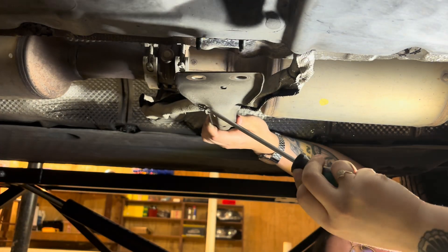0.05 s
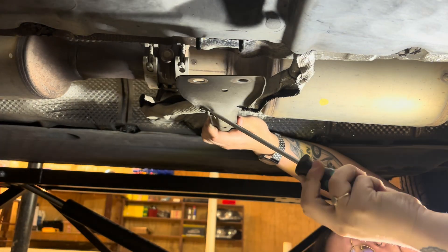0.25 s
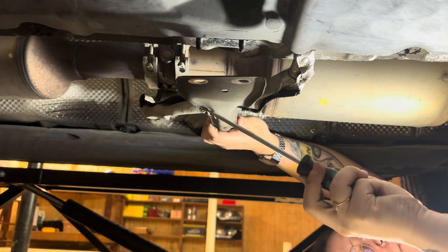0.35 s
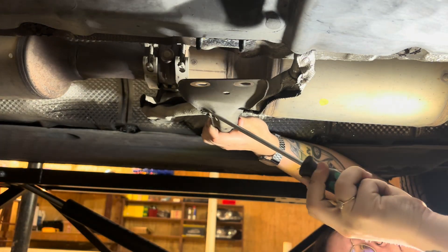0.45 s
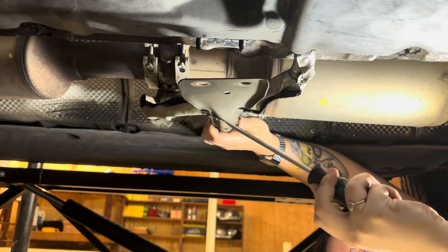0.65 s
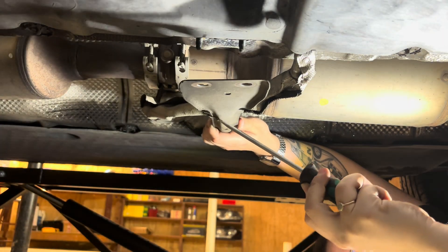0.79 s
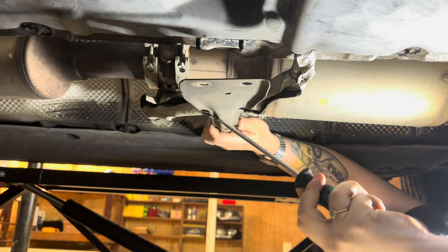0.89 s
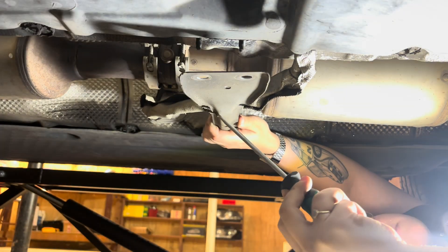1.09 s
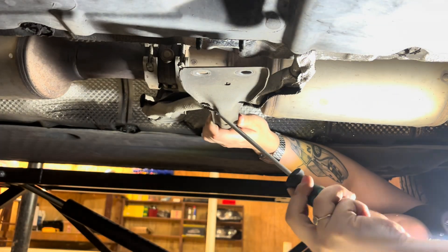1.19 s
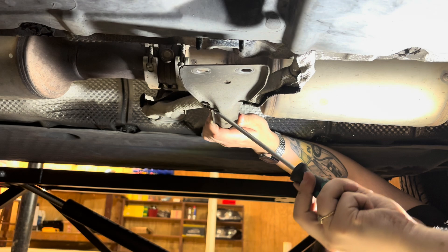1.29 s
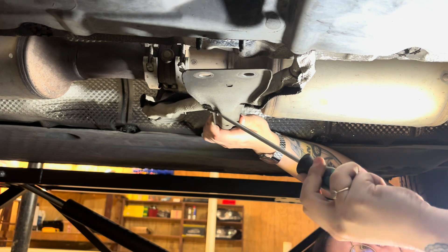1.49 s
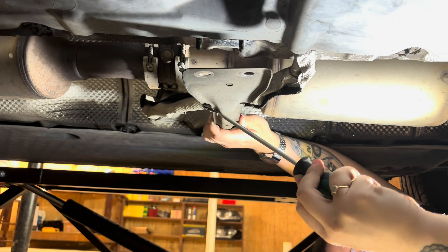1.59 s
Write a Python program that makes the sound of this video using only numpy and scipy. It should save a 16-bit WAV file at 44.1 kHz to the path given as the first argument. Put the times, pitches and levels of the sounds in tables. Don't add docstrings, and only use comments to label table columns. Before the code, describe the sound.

Screwdriver tip slips off a steel bracket with two bright snaps, faint scraping and taps between

```python
import sys
import numpy as np
from scipy import signal
from scipy.fft import rfft, irfft, next_fast_len
from scipy.io import wavfile
from scipy.ndimage import map_coordinates

SR = 44100
rng = np.random.default_rng(int(sys.argv[2]) if len(sys.argv) > 2 else 0)


def unload_audio(sound):
    columns = np.transpose(np.atleast_2d(sound))
    steps = np.round(np.clip(columns, -1, 1) * 32767)
    wavfile.write(sys.argv[1], SR, steps.astype(np.int16))


def volts_from_decibels(level):
    exponent = np.asarray(level, float) / 20
    return 10 ** exponent


N = 72765

# (time [s], level [dB], rise [s], contact t60 [s])
SLIP_1 = [
    (.0755, -23.5, 0.000915, 0.014),
    (.0765, -16.5, 0.0013, .012),
    (.0795, -29, 0.0012, 0.022),
    (.083, -32.5, 0.00089, 0.013),
    (.089, -35.5, 0.00082, 0.024),
    (.097, -41, 0.0018, 0.037),
    (.1045, -32.5, .001, .015),
    (.1075, -35.5, 0.00069, 0.017),
    (.1172, -32, .0007, 0.018),
    (.121, -42, 0.00093, 0.0334),
]
# (time [s], level [dB], rise [s], contact t60 [s])
SLIP_2 = [
    (1.2902, -35.5, 0.00087, 0.0174),
    (1.2925, -36, .001, 0.018),
    (1.296, -32, .0015, 0.024),
    (1.2995, -43.5, 0.00069, 0.0087),
    (1.3025, -43, 0.00104, 0.015),
    (1.313, -49, 0.0022, 0.094),
]
# (frequency [Hz], gain [dB])
CRACK_1 = [(400, -37), (1000, -20), (2200, -28), (3300, -22), (5100, -3.5), (6900, -16.5), (10000, -7),
           (12300, -13), (14200, -7)]
CRACK_2 = [(300, -35), (950, 4.5), (2200, -16), (5300, -6), (7200, -8.5), (9500, -2), (12000, -7),
           (15000, -2.5)]
# (frequency [Hz], starting level [dB], t60 [s])
RING_1 = [(490.2, -27.5, 0.22), (959, -20, .12), (1050, -26, 0.13), (1280, -23, .08), (4710, -3, 0.033),
          (5236, -1.5, .025), (5410, -3, 0.053), (5400, 2.5, 0.043), (5890, -10, 0.039), (8460, -7, .025),
          (10594, -4, 0.031), (11470, -8.5, 0.026), (11230, -7, 0.021), (15060, -9.5, .03)]
RING_2 = [(329, -27.5, 0.3), (404, -28, 0.23), (493, -16, 0.27), (515, -14, 0.23), (942.3, -0.5, 0.1),
          (3370, -22, 0.028), (4360, -23.5, 0.046), (6170, 0, 0.034), (5265, -20, 0.075), (5430, -9, 0.081),
          (5717, -6, .05), (8560, 5, 0.0167), (10100, -16, 0.021), (10000, 4.5, 0.029)]
# (frequency [Hz], t60 [s])
FRAME_T60 = [(400, 0.2), (1500, 0.13), (3200, 0.086), (5300, 0.075), (9500, 0.061), (14000, 0.038)]

# (time [s], level [dB], rise [s], contact t60 [s])
SLIP_2_SKID = [
    (1.279, -49, .003, 0.067),
    (1.284, -37.5, 0.0035, 0.084),
]
# (frequency [Hz], gain [dB])
SLIP_2_SKID_TONE = [(1500, -24), (5300, -13), (7000, -9), (8600, -3), (9900, 2), (11500, -8), (14000, -19)]

# (time [s], level [dB], low mode offset [dB], treble offset [dB])
HARD_STROKE = [(.52, -86, 13, 5), (.545, -67, 3, -4.5), (.55, -58.5, 7, -10), (.568, -51, 6, -3),
               (.577, -53, -5, 1.5), (.6, -52, 0, 2), (.62, -50.5, 3, 3.5), (.645, -55, -0.5, -3.5),
               (.685, -73, -4, -9)]
# (time [s], level [dB], treble offset [dB])
LIGHT_STROKE = [(.655, -53, -3.5), (.68, -64, -14.5), (.72, -55.5, -8), (.765, -56.5, -12.5),
                (.78, -57.5, -7), (.838, -57.5, -14), (.865, -72, -27)]
# (frequency [Hz], width [Hz], level [dB])
HARD_LOW = [(805.5, 60.6, -2), (917, 37, 4), (1038, 74, -7.5), (1310.6, 55.4, -9.5)]
HARD_MID = [(1485, 19, 3.5), (1626, 44, 1), (1760, 45, -1.5), (1963, 96, -3)]
HARD_TOP = [(2857, 34, -10), (3747, 25, -11.5), (4263.5, 20, -4.5), (5375, 60, -12), (5700, 51, -14.5),
            (7100, 91, -13.5), (7900, 17, -12)]
LIGHT_LOW = [(507, 23, -3), (825.4, 59, 2.5), (1028, 51, 2), (1286, 40, -4.5), (1470, 43, 4.5),
             (1740, 26, 4.5)]
LIGHT_TOP = [(3250, 29, -5), (4300, 150, 4.5), (5540, 87, -3.5), (6300, 92, -4.5), (10900, 870, -17)]
# (frequency [Hz], gain [dB])
GRIT_LOW = [(350, 4), (600, 12), (900, 5), (1700, 7.5), (2300, -2), (3500, -63)]
GRIT_TOP = [(1300, -43), (2200, -7), (3100, -1), (4300, 0.5), (5500, -7.5), (8000, -5.5), (11000, -15),
            (15000, -20)]
# (time [s], level [dB])
CATCHES = [(0.538, -54), (.5485, -41.5), (.5595, -46.5), (.568, -44), (.581, -45), (.589, -46), (.597, -43),
           (.611, -41), (.620, -51), (.633, -50), (.645, -55)]
# (time [s], level [dB])
STROKE_SQUEAL = [(.555, -83), (.574, -49.5), (.584, -46), (.592, -47.5), (.600, -56), (.612, -43),
                 (.620, -43), (.630, -46), (.645, -50), (.665, -68)]
SLIP_SQUEAL = [(1.2895, -62), (1.2908, -37), (1.296, -35.5), (1.3015, -36.5), (1.304, -46), (1.318, -56),
               (1.34, -66), (1.36, -85)]

# (time [s], level [dB], rise [s], contact t60 [s])
SKIDS = [(.0728, -33, .0015, 0.058), (.533, -65, 0.0033, 0.107), (.66, -64, 0.0033, 0.068),
         (1.274, -61.5, .004, 0.06), (1.314, -60, 0.00225, 0.08), (1.4255, -65, .0005, 0.012),
         (1.541, -75.5, 0.0014, 0.03), (1.594, -75.5, 0.0029, 0.048), (1.392, -87, 0.0035, 0.12),
         (1.423, -67, 0.00194, 0.046), (1.157, -68.5, 0.0091, 0.022)]
# (frequency [Hz], gain [dB])
SKID_TONE = [(1500, -33.5), (4000, -5), (6500, -5.5), (9000, -3), (14000, -4.5)]
# (time [s], level [dB], rise [s], contact t60 [s])
STOP = [
    (.842, -53.5, 0.0028, 0.053),
    (.847, -55.5, 0.00196, 0.038),
    (.853, -56.5, 0.0017, 0.052),
]
# (frequency [Hz], starting level [dB], t60 [s])
STOP_RING = [(292, -12.5, 0.13), (357, -16, .09), (503, 3.5, 0.055), (810, -15, 0.022), (994, -7.5, 0.08),
             (1298, 7.5, 0.011), (1500, -4, 0.026)]
# (time [s], bracket level [dB], blade level [dB], rise [s], contact t60 [s])
TAPS = [(0.496, -74, -71.5, 0.0014, 0.14), (0.843, -57, -64, 0.0026, 0.058), (1.008, -80, -74, 0.002, 0.1),
        (1.165, -50.5, -58.5, 0.0036, 0.097), (0.331, -50.5, -69, 0.00093, 0.064),
        (1.184, -52.5, -70.5, 0.0062, 0.16), (1.256, -70.5, -70, 0.015, 0.22),
        (1.499, -73, -71, 0.0022, 0.21), (1.533, -58.5, -67.5, 0.0046, 0.17),
        (1.587, -57.5, -68, 0.0026, 0.104), (1.41, -71, -73, 0.0042, 0.065)]
# (frequency [Hz], starting level [dB], t60 [s])
BRACKET = [(332, -4, .038), (517, -3, 0.1), (665, -8.5, 0.071), (768, -2.5, 0.028), (1007, -3.5, 0.052),
           (1273, -2, 0.023), (1457, -2.5, 0.012), (1766, -10, 0.011)]
# (frequency [Hz], gain [dB])
BLADE = [(1500, 1.5), (3000, -12), (4600, -7), (5300, -0.5), (6000, -10), (9000, -12.5), (14000, -25)]

# (time [s], level [dB], rise [s], contact t60 [s])
TICK = [
    (.2505, -55, 0.0012, 0.13),
    (.268, -72, 0.0072, 0.068),
]
# (frequency [Hz], gain [dB])
PLASTIC = [(250, -7), (800, 3.5), (1300, -5), (2200, -10), (3600, -0.5), (4800, -16.5), (12000, -32)]
# (time [s], level [dB], rise [s], contact t60 [s])
BUMP = [
    (.333, -51.5, 0.0021, .1),
    (.341, -51.5, 0.0033, 0.082),
    (.349, -49, 0.0031, 0.061),
    (.366, -58.5, 0.0028, 0.067),
]
# (frequency [Hz], starting level [dB], t60 [s])
HOLLOW = [(259.8, -3.5, 0.54), (295, -6, 0.24), (336, -2.5, 0.22), (388.8, 5, 0.3), (422.3, -7.5, 0.29),
          (461, -11, 0.089), (491.2, -2, 0.24)]
# (frequency [Hz], gain [dB])
HOLLOW_SKIN = [(150, -28), (300, 16), (500, -11), (750, -11.5), (1000, -7.5), (1350, -16.5), (2200, -41),
               (4000, -46)]
# (time [s], level [dB], rise [s], contact t60 [s])
EARLIER = [
    (-0.025, -55, 0.026, 0.099),
]
GRIP_RUSTLE = [
    (.97, -76.5, 0.14, 2.95),
]
# (frequency [Hz], gain [dB])
HANDLING_TONE = [(400, -17.5), (1050, 3.5), (1800, -17), (5000, -9.5), (14000, -22.5)]

# (frequency [Hz], t60 [s])
ROOM_T60 = [(300, 0.76), (3000, 0.38), (5300, 0.33), (12000, 0.4)]
# (frequency [Hz], gain [dB])
HUM = [(8, 2.5), (24, 6), (36, -5.5), (60, -9.5), (75, -2.5), (89, -0.5), (105, -6.5), (140, -15),
       (210, -25.5), (400, -60)]
AIR = [(120, -37.5), (200, 1.5), (623, -7), (968, -11.5), (3310, -28), (4950, -23.5), (6050, -29),
       (13800, -27.5), (16000, -41.5)]


def strike(rows, crack, ring, ring_db, frame_db, hard_hz):
    def softened_modes(hz):
        return modes(ring)(hz) / (1 + 1j * hz / hard_hz) ** 3

    snap = filtered(contacts(rows), colour(crack))
    rung = filtered(blows(rows), softened_modes)
    dense = decay(snap, FRAME_T60, delay_s=0.0011)
    return snap + volts_from_decibels(ring_db) * rung + volts_from_decibels(frame_db) * dense


def slips():
    first = strike(SLIP_1, CRACK_1, RING_1, ring_db=-2, frame_db=-5.5, hard_hz=30000)
    second = strike(SLIP_2, CRACK_2, RING_2, ring_db=-2, frame_db=-5, hard_hz=30000)
    skid = filtered(contacts(SLIP_2_SKID), colour(SLIP_2_SKID_TONE))
    return first + second + skid


def scrape():
    mid, low, top = stroke(HARD_STROKE)
    light, light_top = stroke(LIGHT_STROKE)
    hard_sound = filtered(mid, peaks(HARD_MID)) + filtered(low, peaks(HARD_LOW)) + filtered(top, peaks(HARD_TOP))
    light_sound = filtered(light, peaks(LIGHT_LOW)) + filtered(light_top, peaks(LIGHT_TOP))
    low_grit = volts_from_decibels(-8) * filtered(mid + low + light, colour(GRIT_LOW))
    top_grit = filtered(volts_from_decibels(1.5) * top + volts_from_decibels(-2) * light_top, colour(GRIT_TOP))
    return hard_sound + light_sound + low_grit + top_grit


def stroke(rows):
    grain_db, grains_per_s = 1, 380
    time, level, *offsets = np.transpose(rows)
    t = np.arange(N) / SR
    forces = []
    for db in [level] + [level + offset for offset in offsets]:
        lumps = map_coordinates(rng.standard_normal(4000), [t * grains_per_s])
        grains = unit(volts_from_decibels(grain_db * lumps) * rng.standard_normal(N))
        forces.append(grains * volts_from_decibels(np.interp(t, time, db, -150, -150)))
    return forces


def catches():
    releases = [(time, db, 0, 0.059) for time, db in CATCHES]
    return filtered(blows(releases), peaks(HARD_LOW))


def squeal(rows, tone_hz):
    wander_rad, flutter_db = 0.4, 1.5
    time, db = np.transpose(rows)
    t = np.arange(N) / SR
    wander, flutter = [map_coordinates(row, [t * 250]) for row in rng.standard_normal((2, 500))]
    level = volts_from_decibels(np.interp(t, time, db, -150, -150) + flutter_db * flutter)
    return np.sqrt(2) * level * np.sin(2 * np.pi * tone_hz * t + wander_rad * wander)


def skids():
    return filtered(contacts(SKIDS), colour(SKID_TONE))


def edge_stop():
    return filtered(contacts(STOP) + 2 * blows(STOP), modes(STOP_RING))


def taps():
    on_bracket = contacts([(time, db, rise, t60) for time, db, _, rise, t60 in TAPS])
    on_blade = contacts([(time, db, rise, t60) for time, _, db, rise, t60 in TAPS])
    return filtered(on_bracket, modes(BRACKET)) + filtered(on_blade, colour(BLADE))


def plastic_tick():
    return filtered(contacts(TICK), colour(PLASTIC))


def hollow_bump():
    return strike(BUMP, HOLLOW_SKIN, HOLLOW, ring_db=6, frame_db=-5, hard_hz=600)


def handling():
    return filtered(contacts(EARLIER + GRIP_RUSTLE), colour(HANDLING_TONE))


def room(work):
    return volts_from_decibels(-28.5) * decay(work, ROOM_T60, delay_s=0.006)


def room_tone():
    sway = map_coordinates(rng.standard_normal(40), [np.arange(N) / SR * 8])
    hum = filtered(rng.standard_normal(N), lambda hz: volts_from_decibels(along(HUM, hz)))
    air = filtered(rng.standard_normal(N), lambda hz: volts_from_decibels(along(AIR, hz)))
    return volts_from_decibels(-61) * hum + volts_from_decibels(-74.5 + 0.8 * sway) * air


def contacts(rows):
    t = np.arange(N) / SR
    shape = np.zeros(N)
    for time, db, rise, t60 in rows:
        fade_db = 60 * np.clip(t - time - rise, 0, None) / t60
        shape += volts_from_decibels(db - fade_db) * np.clip((t - time) / rise, 0, 1) ** 2
    return shape * rng.standard_normal(N)


def blows(rows):
    x = np.zeros(N)
    for time, db, rise, t60 in rows:
        burst_s = rise / 5 + t60 / (2 * np.log(1000))
        x[round((time + rise) * SR)] = volts_from_decibels(db) * np.sqrt(SR * burst_s)
    return x


def peaks(rows):
    def response(hz):
        total = 0
        for k, (centre, width, db) in enumerate(rows):
            damping = 1j * hz * width
            total = total + (-1) ** k * volts_from_decibels(db) * damping / (centre ** 2 - hz ** 2 + damping + 1e-9)
        return total
    return response


def modes(rows):
    return peaks([(hz, np.log(1000) / np.pi / t60, db + 20 * np.log10(t60)) for hz, db, t60 in rows])


def colour(points):
    def response(hz):
        cepstrum = irfft(np.log(volts_from_decibels(along(points, hz)) + 1e-6))
        size = len(cepstrum)
        fold = np.where(np.arange(size) < size // 2, 2., 0.)
        return np.exp(rfft(cepstrum * fold))
    return response


def filtered(x, response):
    size = 2 * next_fast_len(N // 2 + SR // 4)
    h = response(np.fft.rfftfreq(size, 1 / SR))
    h = unit(np.abs(h)) * np.exp(1j * np.angle(h))
    return irfft(rfft(x, size) * h, size)[:N]


def decay(x, t60s, delay_s):
    hz, t, z = signal.stft(rng.standard_normal(SR // 2), SR, nperseg=128)
    fade = volts_from_decibels(-60 * t / along(t60s, hz)[:, None])
    tail = signal.istft(z * fade, SR, nperseg=128)[1]
    delayed = np.pad(x, (round(delay_s * SR), 0))
    return signal.fftconvolve(delayed, tail / np.linalg.norm(tail))[:N]


def along(points, hz):
    f, value = np.transpose(points)
    return np.interp(np.log(hz + 1), np.log(f + 1), value)


def unit(x):
    return x / np.sqrt(np.mean(x ** 2) + 1e-30)


def scene():
    work = slips() + scrape() + catches()
    work += squeal(STROKE_SQUEAL, tone_hz=1734) + squeal(SLIP_SQUEAL, tone_hz=5344)
    work += skids() + edge_stop() + taps()
    work += plastic_tick() + hollow_bump() + handling()
    return (work + room(work) + room_tone())[None]


def roll_off(x):
    return signal.sosfilt(signal.butter(12, 16540, fs=SR, output="sos"), x)


def record(dry):
    top_hz, slope_hz = 15300, 200
    hz = np.fft.rfftfreq(N, 1 / SR)
    rolloff = 1 + np.exp(np.clip((hz - top_hz) / slope_hz, -50, 50))
    mix = irfft(rfft(dry) / rolloff, N)
    return roll_off(mix)


dry = scene()
out = record(dry)
unload_audio(out)
```